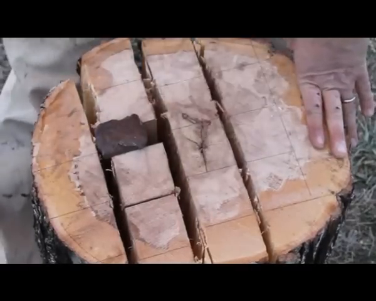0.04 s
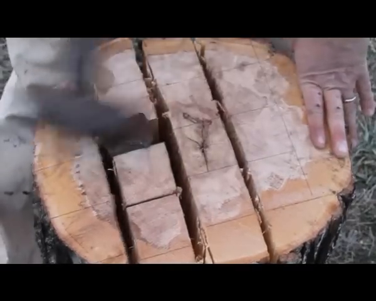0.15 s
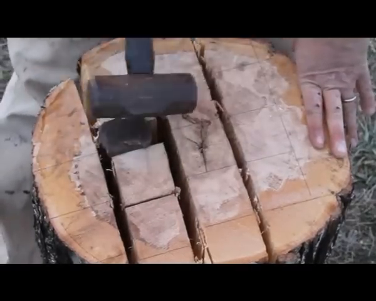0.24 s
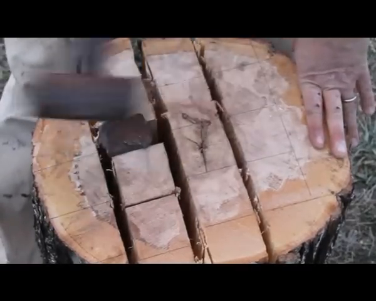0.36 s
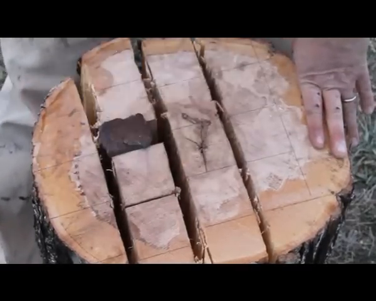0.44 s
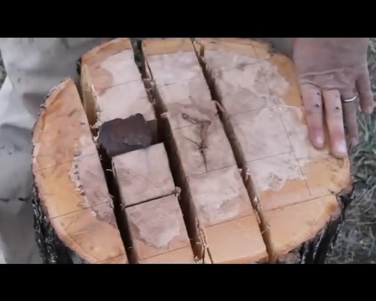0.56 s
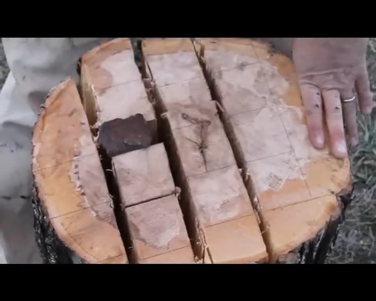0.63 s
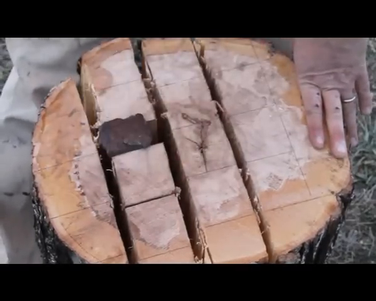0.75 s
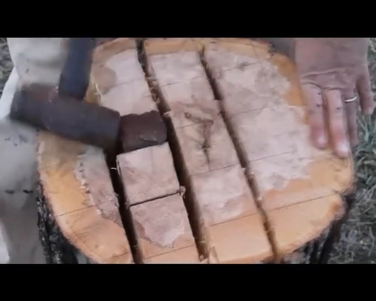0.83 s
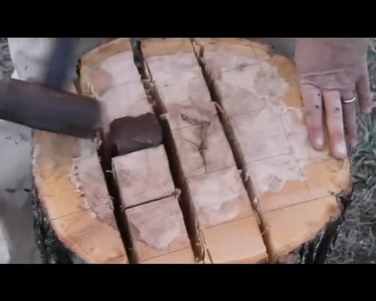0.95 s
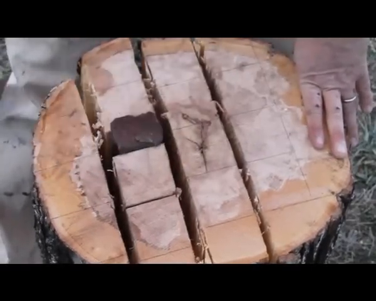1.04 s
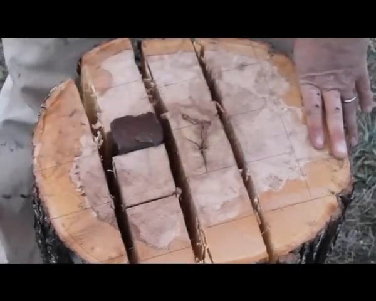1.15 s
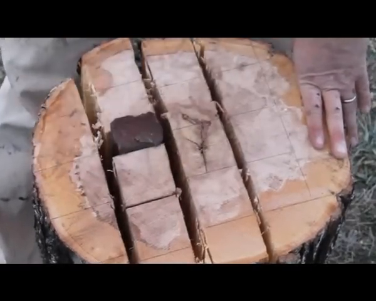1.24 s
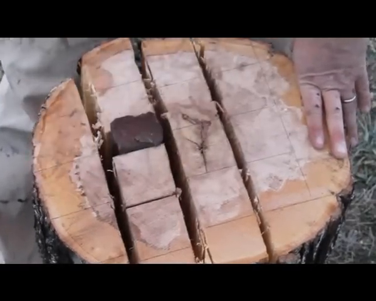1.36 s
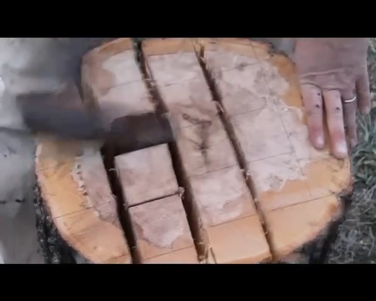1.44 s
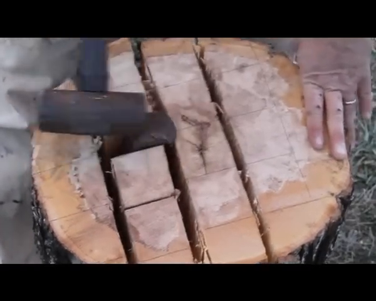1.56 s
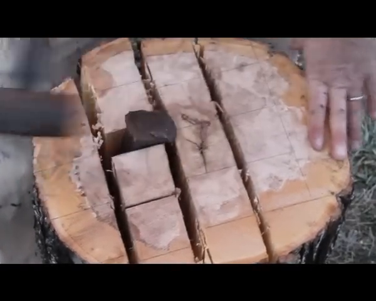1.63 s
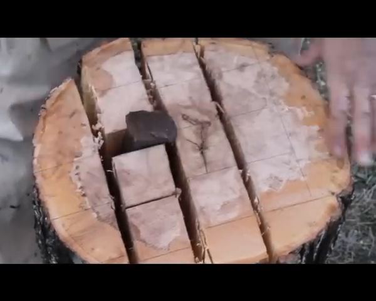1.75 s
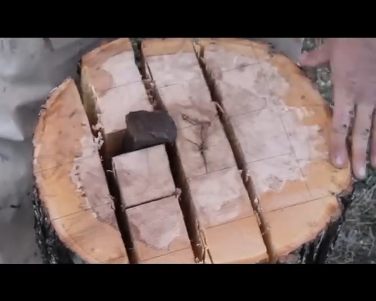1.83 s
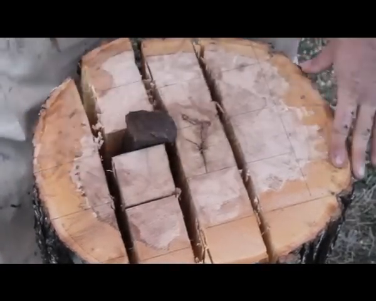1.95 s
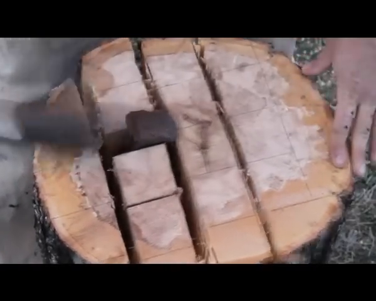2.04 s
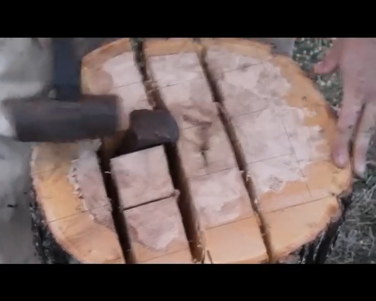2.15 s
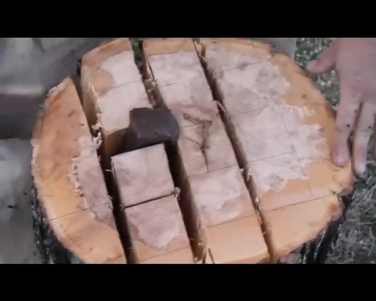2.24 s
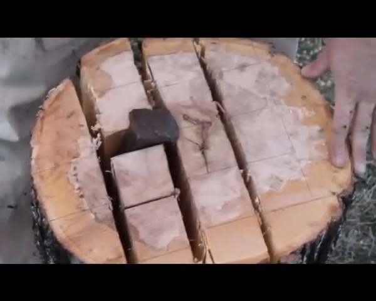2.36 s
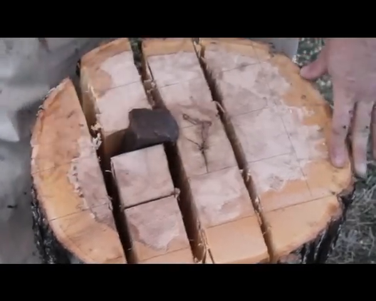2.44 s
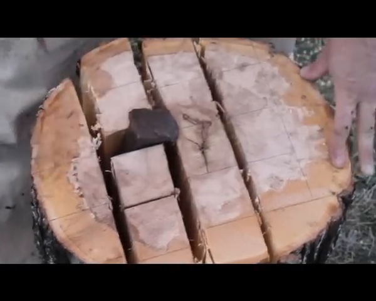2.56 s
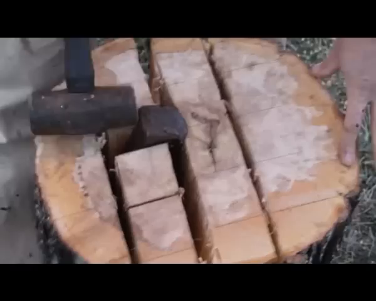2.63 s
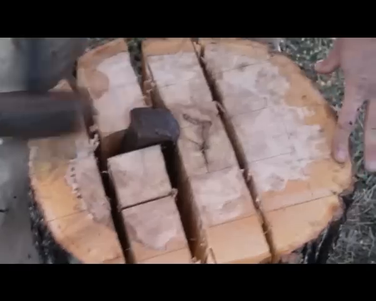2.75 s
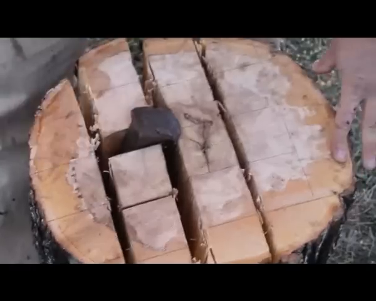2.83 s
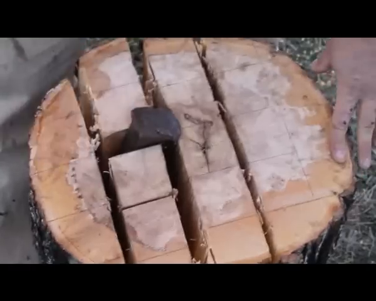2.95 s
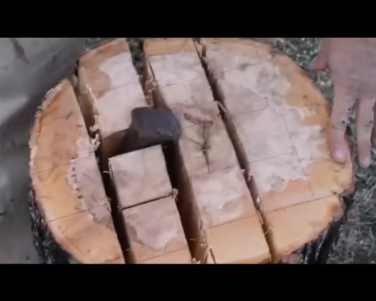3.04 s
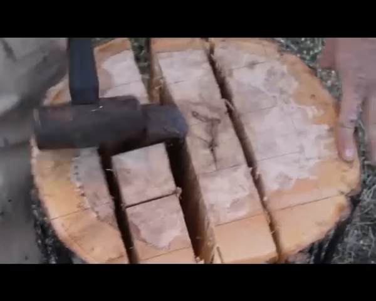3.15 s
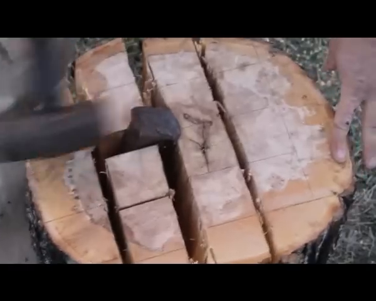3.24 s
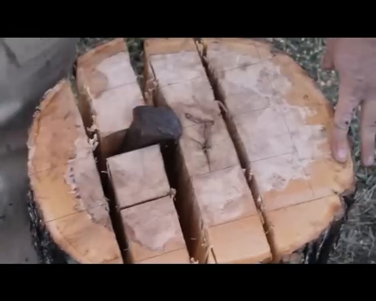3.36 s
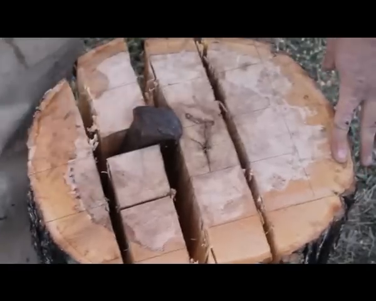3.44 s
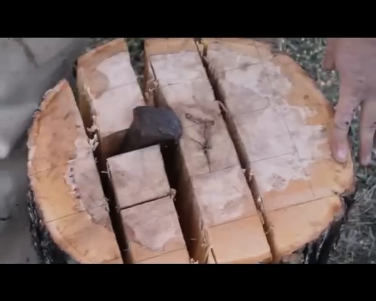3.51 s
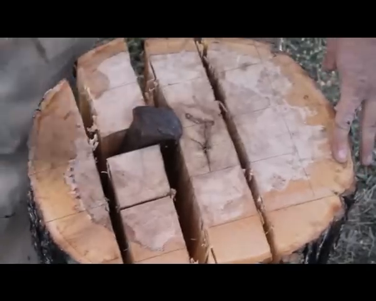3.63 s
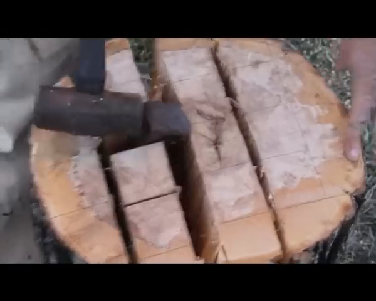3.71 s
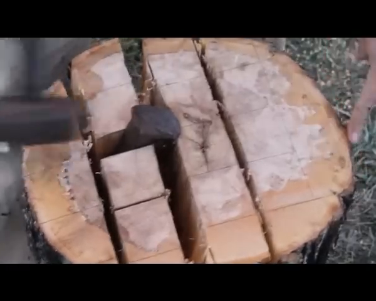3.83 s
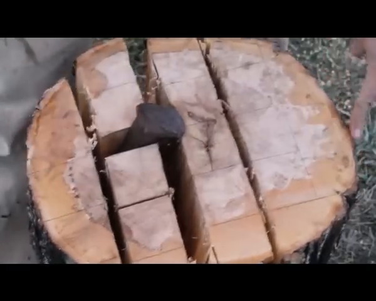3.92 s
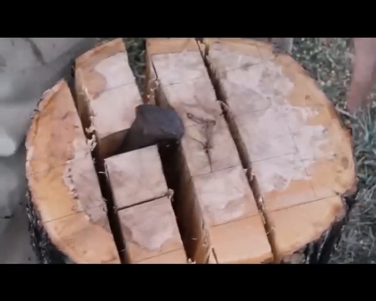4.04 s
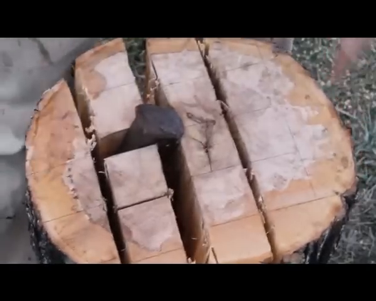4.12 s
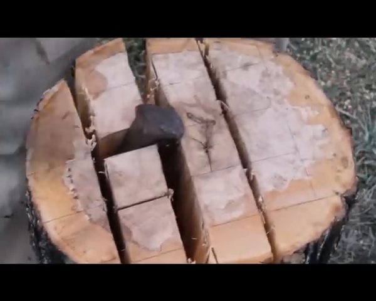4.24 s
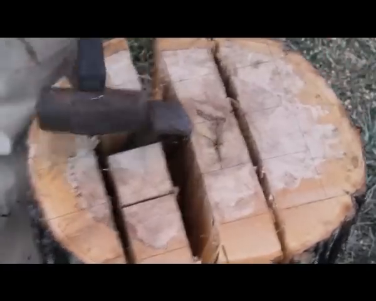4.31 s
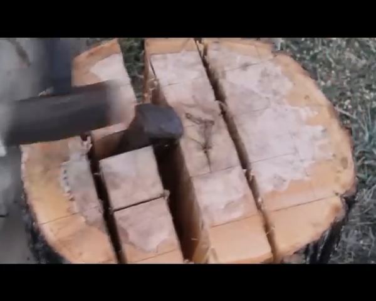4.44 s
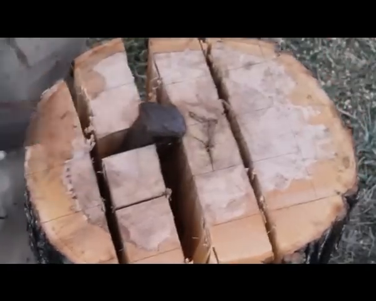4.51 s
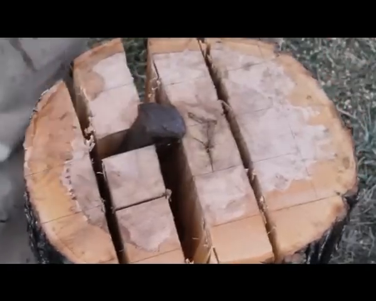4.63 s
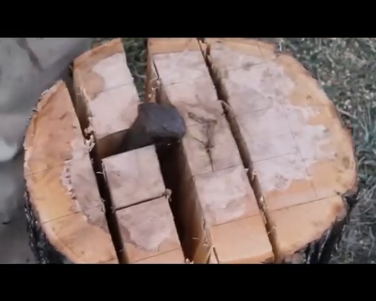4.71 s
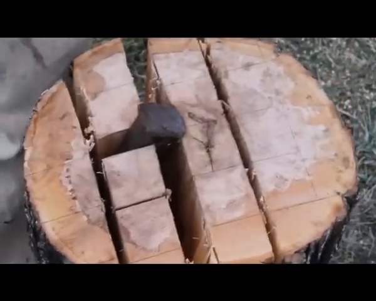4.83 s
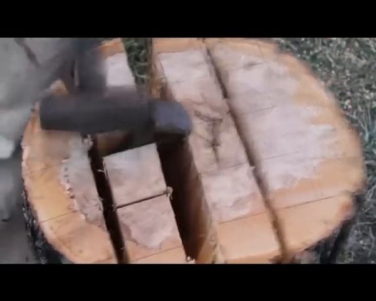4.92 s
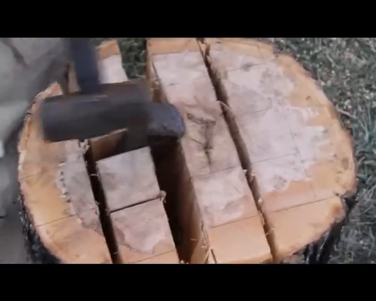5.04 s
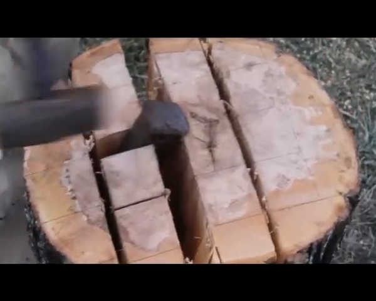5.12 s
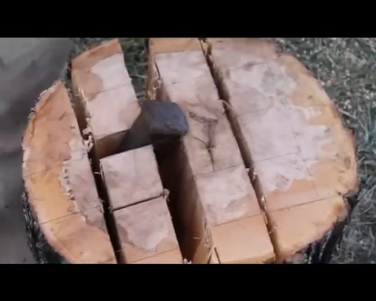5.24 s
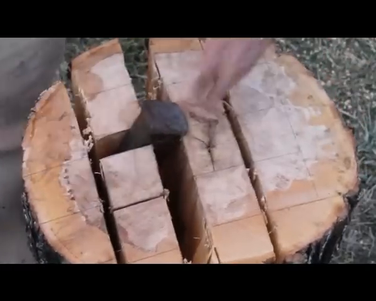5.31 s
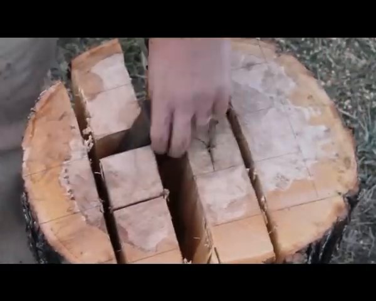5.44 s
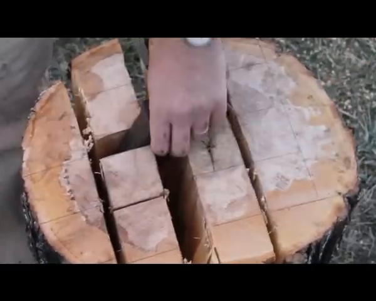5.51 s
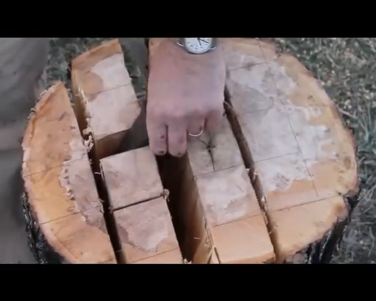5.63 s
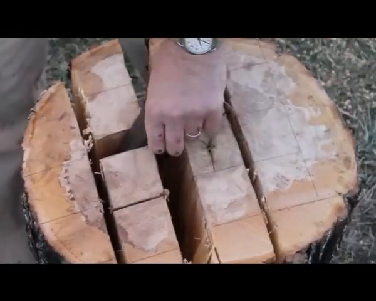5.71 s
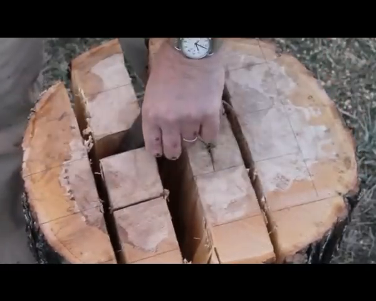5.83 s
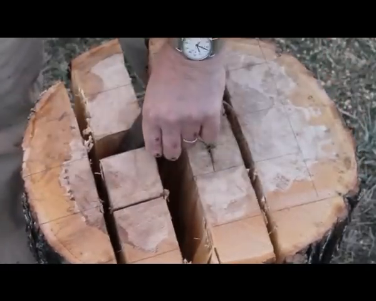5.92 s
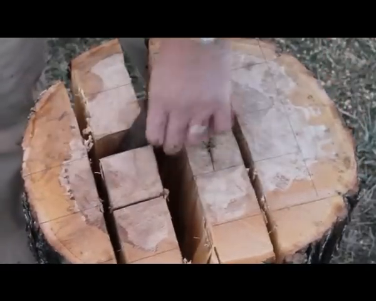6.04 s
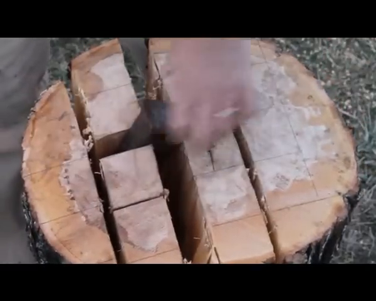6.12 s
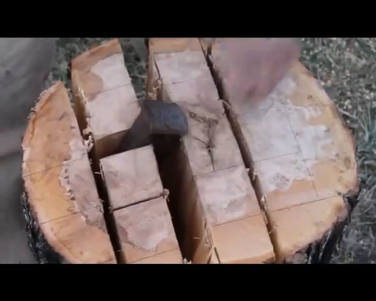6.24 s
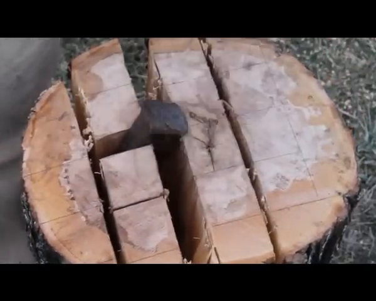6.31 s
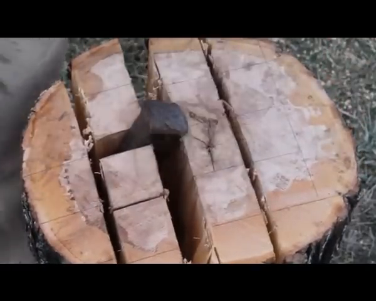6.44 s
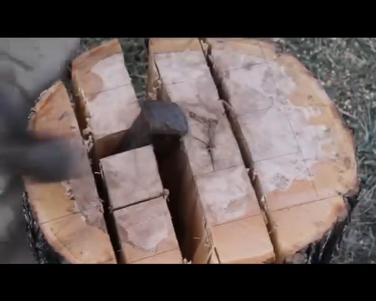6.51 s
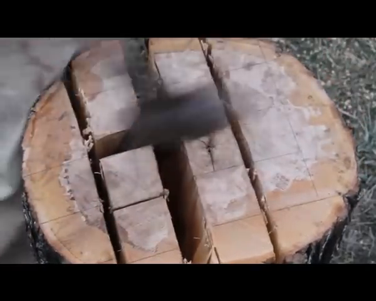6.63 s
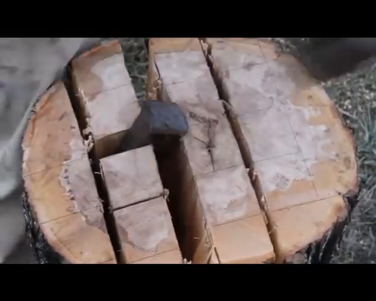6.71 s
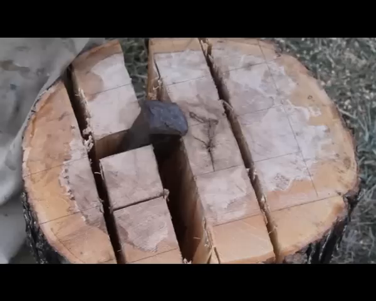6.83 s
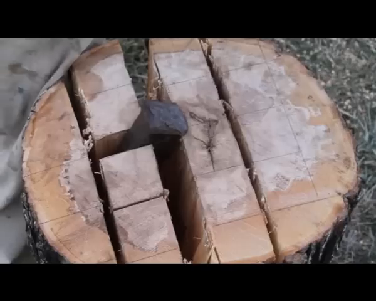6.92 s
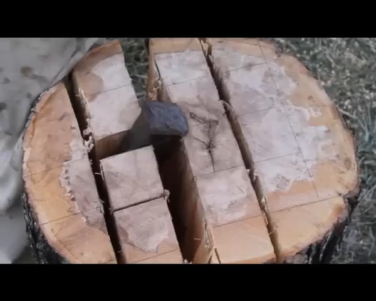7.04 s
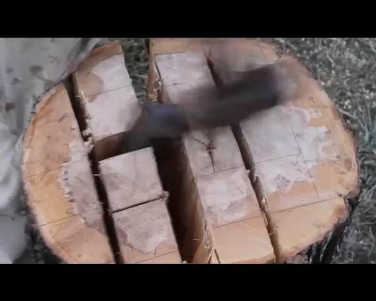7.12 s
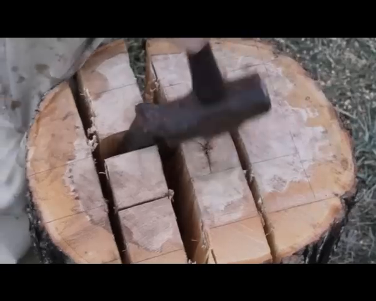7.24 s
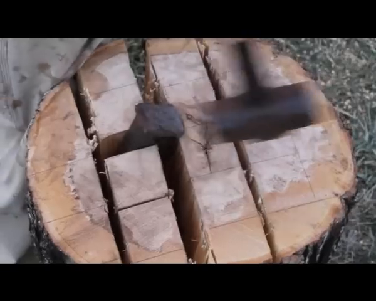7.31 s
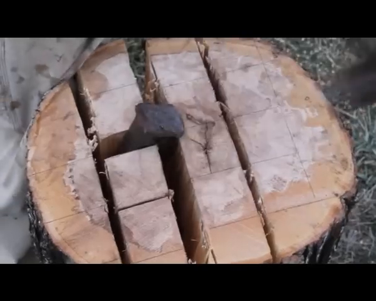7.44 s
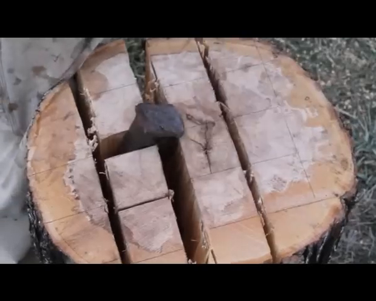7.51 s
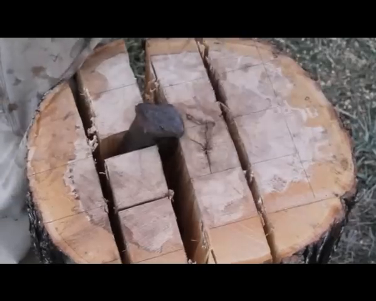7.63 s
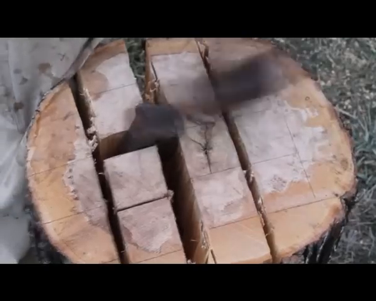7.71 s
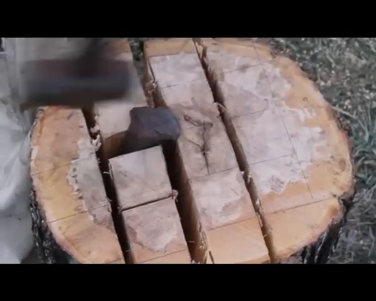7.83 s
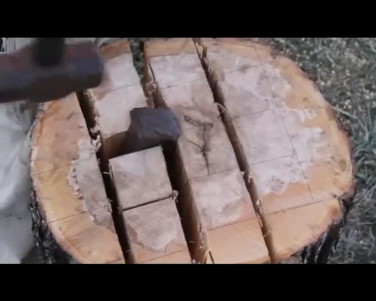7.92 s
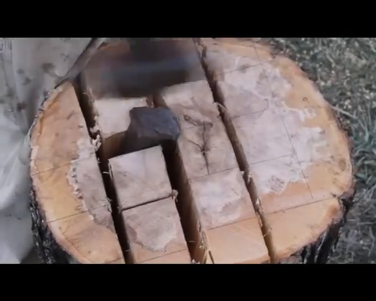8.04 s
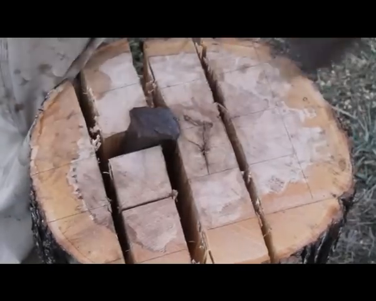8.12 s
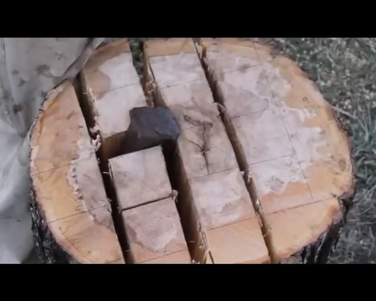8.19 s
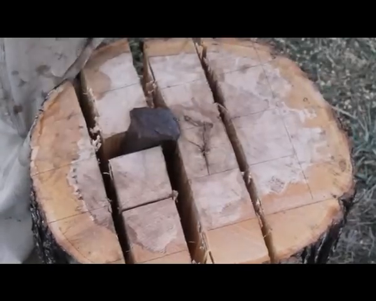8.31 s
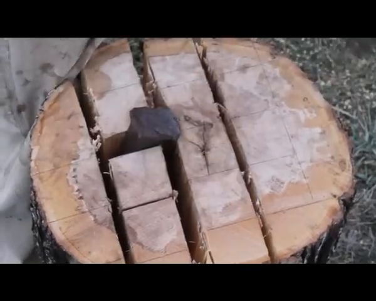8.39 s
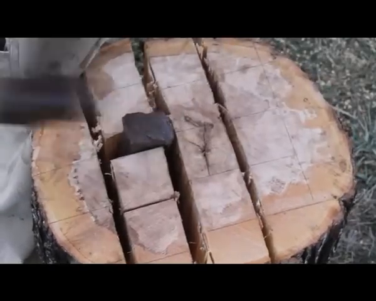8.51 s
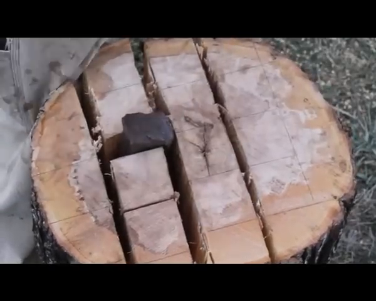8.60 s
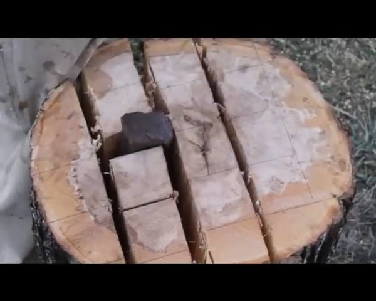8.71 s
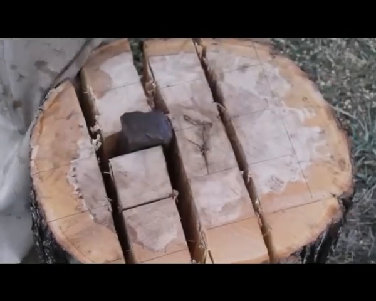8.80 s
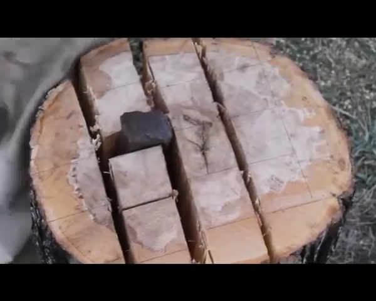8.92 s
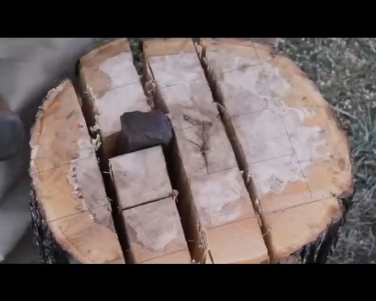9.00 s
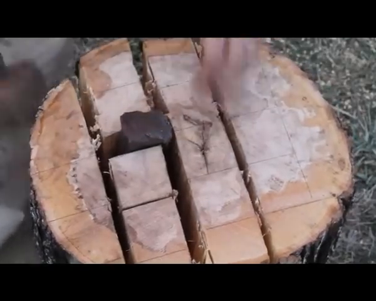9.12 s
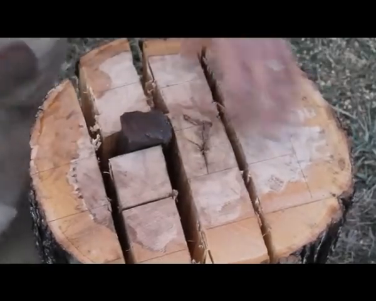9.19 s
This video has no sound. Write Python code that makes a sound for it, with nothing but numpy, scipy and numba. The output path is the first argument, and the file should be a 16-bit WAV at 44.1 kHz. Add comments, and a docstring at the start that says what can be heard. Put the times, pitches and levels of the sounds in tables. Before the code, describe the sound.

Close up in a quiet yard, a heavy hammer drives a metal wedge into a log. Nine hard, evenly spaced strikes clink and ring over the knock of wood, each with a light echo. A faint distant engine hums under the first few and dies away. The hammering stops, boots shift softly on turf, and three gentler metallic taps finish the job.

```python
"""Outdoors in a yard, a camera microphone close to a sawn log; a far engine hums and swells.
A club hammer drives a steel wedge in: each blow cracks, rings the steel and knocks the log; walls and
trees answer. Hard blows clip for a few milliseconds before the limiter ducks them. The engine dies away
as the wedge starts to lean, so the log rocks and drops back. Fibres snap in the split, boots shift on
the turf, and after a pause three light taps set the wedge upright again."""
import sys
import numpy as np
from scipy import signal
from scipy.fft import rfft, irfft, next_fast_len
from scipy.io import wavfile
from scipy.ndimage import minimum_filter1d
from numba import njit

SR = 44100
rng = np.random.default_rng(int(sys.argv[2]) if len(sys.argv) > 2 else 0)


def dump_mix(stems):
    """Bounce the given channels to the path in sys.argv[1] as a 16-bit WAV at rate SR."""
    frames = np.atleast_2d(stems).T  # one column per channel
    limited = np.clip(frames, -1, 1)  # hard clip at full scale
    pcm = np.round(limited * 32767).astype(np.int16)
    wavfile.write(sys.argv[1], SR, pcm)


N = 408363
AGE = np.arange(int(.45 * SR)) / SR  # seconds since a hit
SHORT = int(.13 * SR)  # samples in a knock or crack

# The hammer, close to the microphone. Each row: start in seconds, force on the steel in dB, knock in
# the log in dB, lean of the wedge from 0 to 1, aim from centre 0 to edge 1.
HAMMER_BLOWS = [(0.214, -7, -20, 0, 1), (.919, -1, -19, 0, 0.64), (1.534, -4.5, -21.5, 0.41, 0.6),
                (2.144, -7.5, -23, 0.71, 0.045), (2.679, -2.5, -20, 0.74, 0.75),
                (3.199, -5, -19.5, 0.99, 0.34), (3.7667, -2.5, -16.5, 0.99, 0.74),
                (4.368, 0, -19.5, 0.78, 0.46), (4.9978, -0.5, -19, .93, 0.6), (7.2101, -13, -32, .95, 0.64),
                (7.8127, -12.5, -29, 0.17, 0.57), (8.5279, -11, -29, 0.04, 0.64)]
# Wedge and hammer head ringing. Each row: pitch in Hz, relative level in dB, t60 in seconds, family.
STEEL_MODES = [(4321, -3.5, 0.07, "clang"), (4416, -8, .08, "clang"), (4210, -8.5, 0.029, "clang"),
               (4630, -4.5, 0.037, "clang"), (5270, -15, 0.028, "clang"), (4782, -2, 0.089, "peal"),
               (4700, -4, 0.049, "peal"), (4827, -3, 0.041, "peal"), (4870, -12.5, .06, "peal"),
               (8576, -11, 0.26, "ping"), (9257, -6.5, 0.12, "chink"), (9183, -13, .09, "chink"),
               (9700, -23, .08, "chink"), (12550, -29, .1, "chink"), (13405, -29.5, .1, "chink"),
               (11502, -6, 0.24, "sing"), (7605, -31, 0.31, "sing"), (10900, -21, 0.033, "chink"),
               (15900, -36.5, .22, "chink"), (14200, -1, 0.1, "sheen"), (15800, -14.5, .2, "sheen"),
               (10400, -14.5, .12, "sheen")]
# How each family of modes answers a blow. Each row: gain at full force in dB, dB per dB of force,
# dB added at full lean, dB added at the edge.
FAMILY_RESPONSE = {"clang": (24, 1.5, -2.5, -16), "peal": (15, 3.5, -6, 8), "ping": (-20, 1.3, -13.5, 27),
                   "chink": (-7.5, 1.66, 13, 15.5), "sing": (-2, 1.1, -1, -10),
                   "sheen": (13, 3, -18, -10.5)}
# The crack of contact, heard close. Each row: frequency in Hz, relative noise density in dB.
CRACK_SPECTRUM = [(100, -21), (400, -8), (950, -1), (1500, -0.5), (2300, 0.5), (3300, 2), (4600, 0.5),
                  (6000, -10.5), (10000, -11.5), (16000, -25)]


def hammer_blows(crack_db=8, log_db=22, lean_tilt_db=2.5, grip_detune=.0007):
    """Steel on steel: a crack, the wedge grinding into fibres, the log's knock, both tools ringing."""
    out = np.zeros(N)
    hz, db, t60 = np.transpose([mode[:3] for mode in STEEL_MODES])
    full_db, growth, lean_db, edge_db = np.transpose([FAMILY_RESPONSE[mode[-1]] for mode in STEEL_MODES])
    for start, force_db, knock_db, lean, aim in HAMMER_BLOWS:
        crack = amp(crack_db) * fade(.054, SHORT) * noise(CRACK_SPECTRUM, SHORT)
        grind = fade(.07, SHORT) * lowpass(noise(CRACK_SPECTRUM, SHORT), hz=3000)
        tilt = lean_tilt_db * (lean - .5)  # the log knocks brighter as the split opens
        wood = log_ring(detune=.035, scatter_db=.95, damping=1.15, db_per_octave=tilt)
        add(out, start, amp(force_db) * (crack + grind) + amp(log_db + knock_db) * wood)
        levels = db + full_db + growth * force_db + lean_db * lean + edge_db * aim
        pitches = hz * (1 + grip_detune * rng.standard_normal(len(hz)))  # the wood's grip bends them
        phases = rng.uniform(0, 2 * np.pi, len(hz))
        add(out, start, ring(pitches, levels, t60, phases, beat_db=4))  # beats as the hammer recoils
    return out


# The log's resonances. Each row: pitch in Hz, relative level in dB, t60 in seconds before damping.
LOG_MODES = [(194, -14, 0.11), (264, -14, 0.13), (348, -5, 0.1), (434.4, -4.5, 0.12), (498.7, -3.5, .115),
             (652, -7, 0.092), (810, -3, .07), (908, 0, 0.089), (1045, -2, .05), (1236, -2, 0.066),
             (1426, -3, 0.083), (1693, -0.5, 0.04), (1943, -2, 0.025), (2238, 1, .03), (2934, -7.5, 0.031),
             (3414, -8, .04)]
PIVOT_HZ = 800  # the log's spectrum tilts about this pitch


def log_ring(detune, scatter_db, damping, db_per_octave):
    """The slotted log rings a little differently wherever it is hit."""
    hz, db, t60 = np.transpose(LOG_MODES)
    strength, pitch, side = rng.standard_normal((3, len(LOG_MODES)))
    levels = db + scatter_db * strength + db_per_octave * np.log2(hz / PIVOT_HZ)
    return ring(hz * np.exp(detune * pitch), levels, t60 / damping, np.pi * (side > 0), SHORT)


def log_drops(full_lean_flight_s=.0612, bright_hz=1500, hop_share=.18):
    """A leaning wedge tips the log, which lands and hops once more; gives rows like WOOD_KNOCKS."""
    rows = []
    for start, _, _, lean, _ in HAMMER_BLOWS:
        flight = full_lean_flight_s - .016 * (1 - lean)
        db = 1 - 20 * (1 - lean)  # with the wedge upright the log hardly lifts
        rows.append((start + flight, db, bright_hz))
        rows.append((start + flight * (1 + hop_share), db - 3, bright_hz / 2))
    return rows


# The hammer grazing wood and slabs clacking together, close by.
# Each row: start in seconds, level in dB, brightness as a low-pass cutoff in Hz.
WOOD_KNOCKS = [(.212, 4, 3035), (0.247, 11, 4030), (1.5285, 10, 800), (1.57, 5.5, 796.4), (2.1396, 5, 1500),
               (2.76, 2, 2198), (3.840, 5.5, 2400), (4.171, -27.5, 1821), (7.1916, 8, 1000),
               (7.199, 3, 2400), (7.222, 5.5, 3200), (7.32, -9.5, 650)]


def wood_knocks(body_db=-8, rasp_db=-10, contact_s=.0012):
    """Glancing touches and the log dropping back after a blow; softer contacts are duller."""
    out = np.zeros(N)
    contact = 1 - np.exp(-AGE[:SHORT] / contact_s)
    for start, db, bright_hz in WOOD_KNOCKS + log_drops():
        tilt = np.log2(bright_hz / PIVOT_HZ)
        body = amp(body_db) * log_ring(detune=.06, scatter_db=1.5, damping=2.8, db_per_octave=tilt)
        rasp = amp(rasp_db) * fade(.026, SHORT) * noise(CRACK_SPECTRUM, SHORT)
        add(out, start, amp(db) * lowpass(contact * (body + rasp), bright_hz))
    return out


# Faint ticks from inside the split. Each row: start in seconds, level in dB.
FIBRE_SNAPS = [(4.039, -46.5), (4.237, -32.5)]


def fibre_snaps(t60=.025):
    """Strained wood fibres let go a moment after a blow with a thin, bright tick."""
    out = np.zeros(N)
    spectrum = [(500, -21.5), (2500, -8), (6000, -2), (9500, -2), (15000, -6.5)]
    for start, db in FIBRE_SNAPS:
        add(out, start, amp(db) * fade(t60, SHORT) * noise(spectrum, SHORT))
    return out


# Boots on the turf beside the log. Each row: start in seconds, relative level in dB.
BOOT_THUDS = [(4.743, -31), (5.713, -38), (7.119, -31), (7.32, -21), (7.482, -27), (7.702, -25)]


def boot_thuds(level_db=-1, heel_lead_s=.07, heel_db=-7.5):
    """Weight shifting on soft ground, a lighter heel touch before each thud."""
    out = np.zeros(N)
    spectrum = [(30, -23), (75, 1), (140, 0), (260, -12.5), (600, -49), (3000, -62)]
    envelope = fade(.13, SHORT) * (1 - np.exp(-AGE[:SHORT] / .0044))
    heels = [(start - heel_lead_s, db + heel_db) for start, db in BOOT_THUDS]
    for start, db in BOOT_THUDS + heels:
        add(out, start, amp(db + level_db) * envelope * noise(spectrum, SHORT))
    return out


# Walls and trees around the microphone. Each row: delay in seconds, level in dB, smear in seconds.
YARD_ECHOES = [(0.021, -20.5, 0.015), (.05, -44.5, 0.068), (.094, -38.5, 0.026), (.13, -42.5, 0.033),
               (0.164, -55, .04), (.258, -56.5, .11)]
# The colour of what they send back. Each row: frequency in Hz, relative level in dB.
ECHO_SPECTRUM = [(150, -5.5), (500, -5.5), (1100, -1.5), (2000, 0.5), (3300, -5), (4600, 2.5), (6500, -7),
                 (9000, -18.5), (15000, -35)]
# The yard's lingering tail. Each row: frequency in Hz, t60 in seconds.
YARD_DECAY = [(200, .6), (1400, 4.3), (4600, 1.16), (9000, 0.56), (15000, .3)]


def yard_echoes(x, tail_db=-44):
    """Smeared reflections from walls and trees, then a faint long tail."""
    hz, t, bands = signal.stft(noise(ECHO_SPECTRUM, SR), SR, nperseg=256)
    decay = amp(-60 * t / along(YARD_DECAY, hz)[:, None])
    response = signal.istft(bands * decay, SR, nperseg=256)[1]
    response *= amp(tail_db) / np.linalg.norm(response)
    onset = 1 - np.exp(-AGE / .0023)
    for delay, db, smear in YARD_ECHOES:
        burst = noise(ECHO_SPECTRUM, len(AGE)) * fade(3 * smear) * onset
        add(response, delay, amp(db) * burst / np.linalg.norm(burst))
    return signal.oaconvolve(x, response)[:N]


def far_engine(running_hz=126, idle_hz=96, waver_hz=.87, peak_db=-42.5, throttle_off_s=1.5):
    """A distant engine's hum swells, then sinks to idle and fades once the throttle closes."""
    t = np.arange(N) / SR
    before, after = np.maximum(throttle_off_s - t, 0), np.maximum(t - throttle_off_s, 0)
    hz = idle_hz + (running_hz - idle_hz) * np.exp(-after / .36)
    db = peak_db - 3.5 * before - 26 * after  # swell and fade in dB per second
    waver = unit(lowpass(rng.standard_normal(N), hz=6))
    phase = 2 * np.pi * np.cumsum(hz + waver_hz * waver) / SR
    return amp(db) * np.sqrt(2) * np.sin(phase)


# Open air all around the microphone. Each row: frequency in Hz, relative noise density in dB.
AIR_SPECTRUM = [(25, -15), (60, -3), (130, -0.5), (200, -3.5), (300, -11.5), (600, -10), (1100, -10),
                (1700, -13.5), (2600, -19.5), (5000, -24), (9000, -31), (16000, -41)]


def open_air(level_db=-50.5, calm_db_per_s=.03):
    """A soft, low rush of outdoor air that slowly calms."""
    t = np.arange(N) / SR
    return amp(level_db - calm_db_per_s * t) * noise(AIR_SPECTRUM, N)


def ring(hz, db, t60, phase, size=None, beat_db=0, beat_hz=14):
    """A sum of damped sines; with beat_db each swells and sinks at its own rate around beat_hz."""
    angles = (2 * np.pi * hz[:, None] * AGE[:size] + phase[:, None]).astype(np.float32)
    modes = fade(t60[:, None], size) * np.sin(angles)
    if beat_db:
        rate, offset = rng.uniform(size=(2, len(hz), 1))
        beat_cycles = beat_hz * (.5 + rate) * AGE[:size] + offset
        modes *= amp(beat_db * np.sin(2 * np.pi * beat_cycles, dtype=np.float32))
    return amp(db) @ modes


def amp(db):
    """Decibels to gain."""
    return 10 ** (np.asarray(db) / 20)


def unit(x):
    """Scale to rms 1."""
    return x / np.sqrt(np.mean(x ** 2) + 1e-20)


def along(points, hz):
    """Read (Hz, value) points on a log frequency axis."""
    freqs, values = np.transpose(points)
    return np.interp(np.log(hz + 1), np.log(freqs), values)


def fade(t60, size=None):
    """Exponential decay, 60 dB down after t60 seconds."""
    return np.exp(-np.log(1000) * AGE[:size] / np.maximum(t60, 1e-4))


def noise(spectrum, size):
    """Noise of rms 1, coloured by (Hz, dB) points."""
    padded = next_fast_len(size)
    colour = amp(along(spectrum, np.fft.rfftfreq(padded, 1 / SR)))
    return unit(irfft(rfft(rng.standard_normal(padded)) * colour, padded)[:size])


def lowpass(x, hz, order=2):
    """Causal low-pass."""
    return signal.sosfilt(signal.butter(order, hz, fs=SR, output="sos"), x)


def add(track, start, sound):
    """Mix a sound in, start seconds along the track."""
    span = track[max(round(start * SR), 0):][:len(sound)]
    span += sound[:len(span)]


def scene():
    """At the microphone, in mono: the close work, its echoes, boots, a far engine and open air."""
    work = hammer_blows() + wood_knocks() + fibre_snaps()
    return (work + yard_echoes(work) + boot_thuds() + far_engine() + open_air())[None]


@njit
def limiter_gain(level_db, ceiling_db, attack, release):
    """Gain in dB that quickly pulls peaks towards the ceiling and relaxes more slowly."""
    gain, now = np.zeros(len(level_db)), 0.
    for i in range(len(level_db)):
        need = min(ceiling_db - level_db[i], 0.)
        now += (need - now) * (attack if need < now else release)
        gain[i] = now
    return gain


def record(dry, ceiling_db=-7, attack_s=.0055, release_s=.016, low_cut_hz=45, top_hz=15800):
    """The camera's input: a limiter too slow for the attack, clipping, a low cut and a band limit."""
    x = dry[0]
    peak = -minimum_filter1d(-np.abs(x), size=33, origin=16)
    peak_db = 20 * np.log10(peak + 1e-9)
    gain_db = limiter_gain(peak_db, ceiling_db, 1 / (attack_s * SR), 1 / (release_s * SR))
    clipped = np.clip(x * amp(gain_db), -1, 1)
    thinned = clipped - lowpass(clipped, low_cut_hz, order=1)
    return signal.oaconvolve(thinned, signal.firwin(255, top_hz, fs=SR), "same")[None]


dry = scene()
out = record(dry)
dump_mix(out)
```